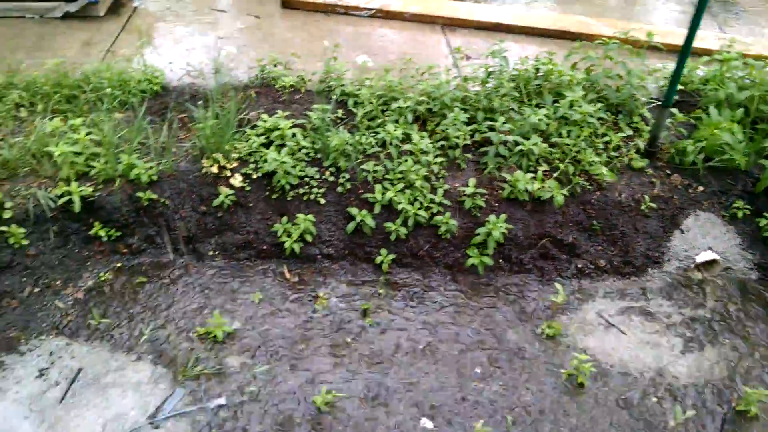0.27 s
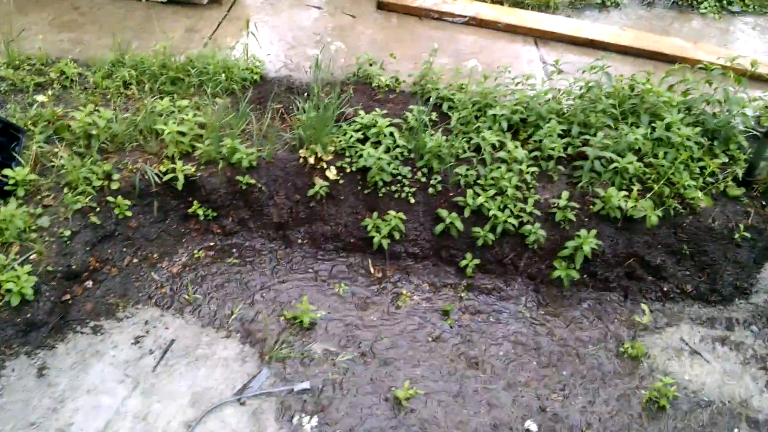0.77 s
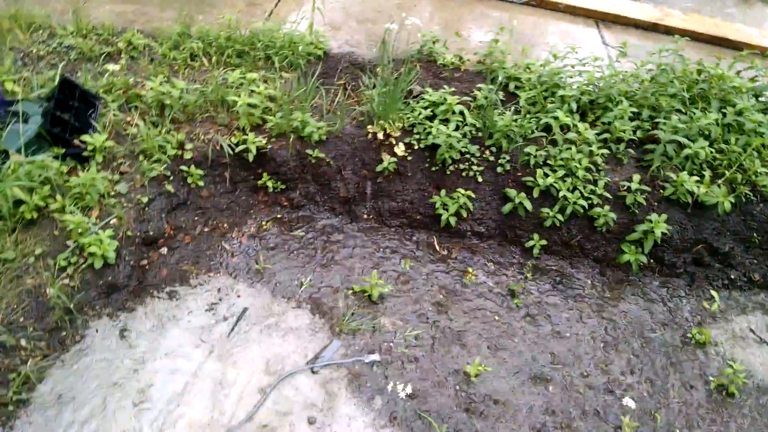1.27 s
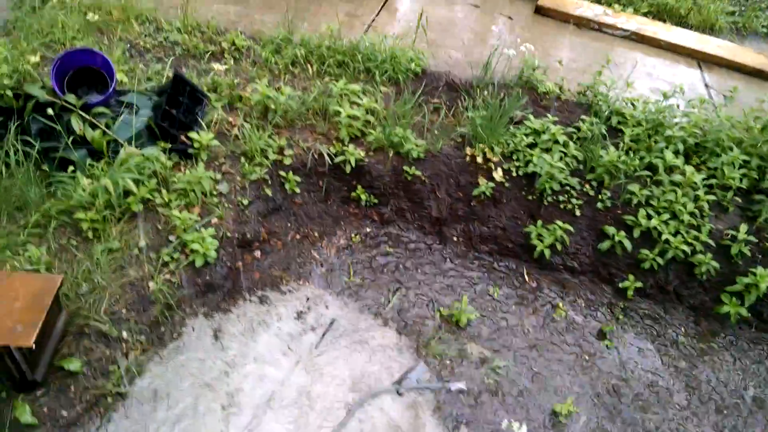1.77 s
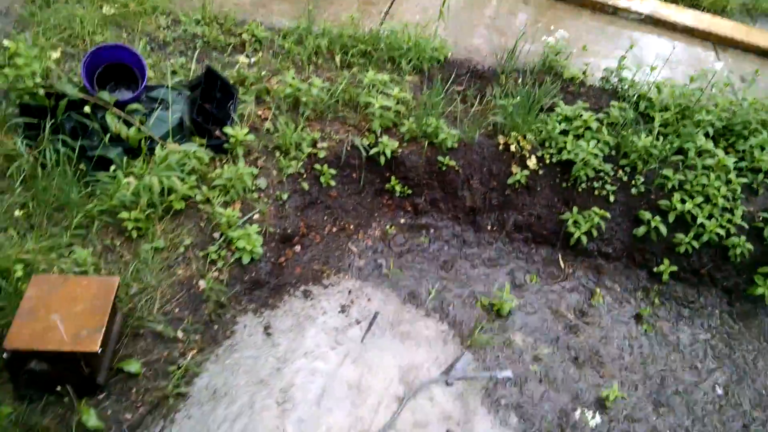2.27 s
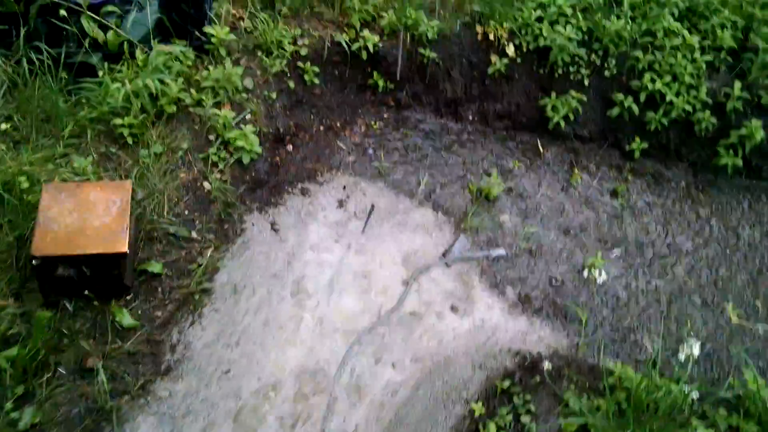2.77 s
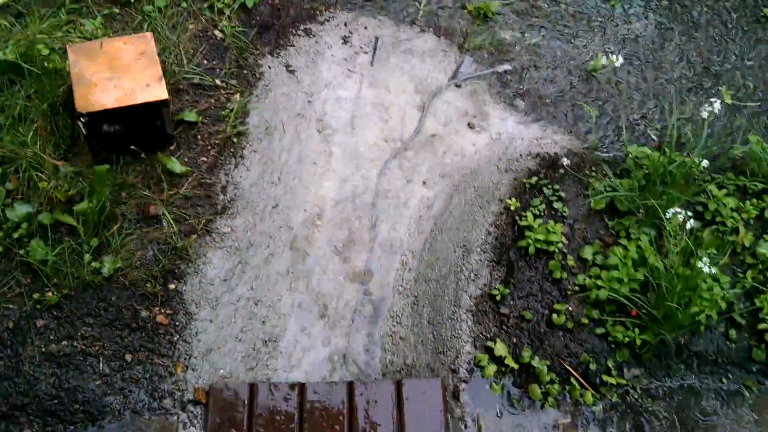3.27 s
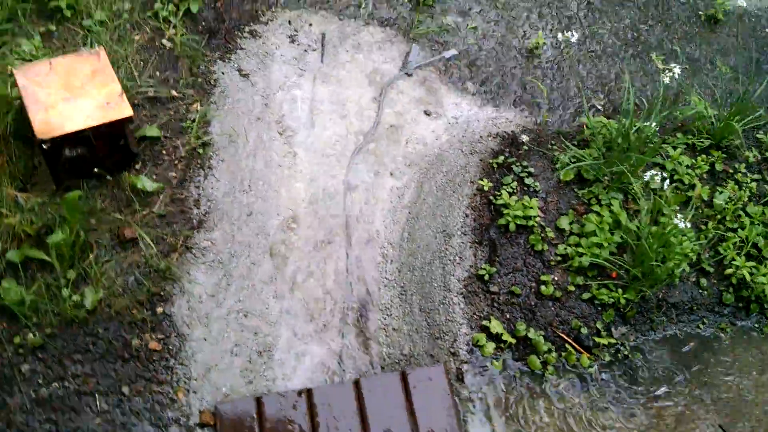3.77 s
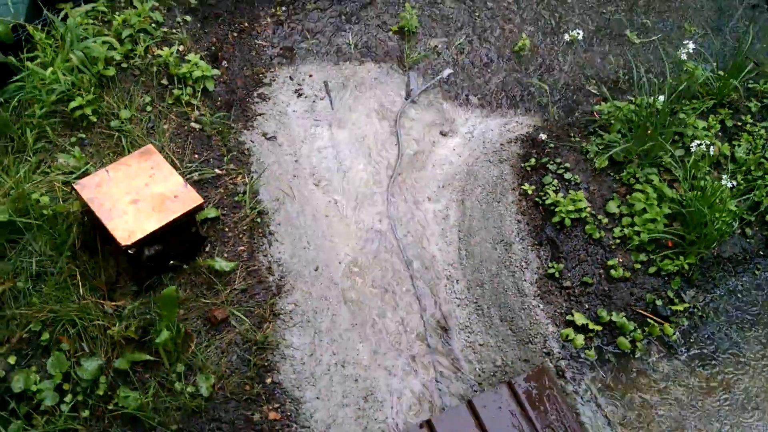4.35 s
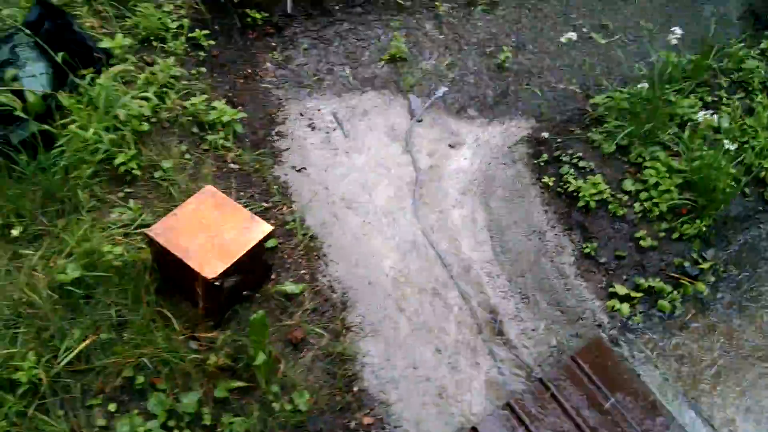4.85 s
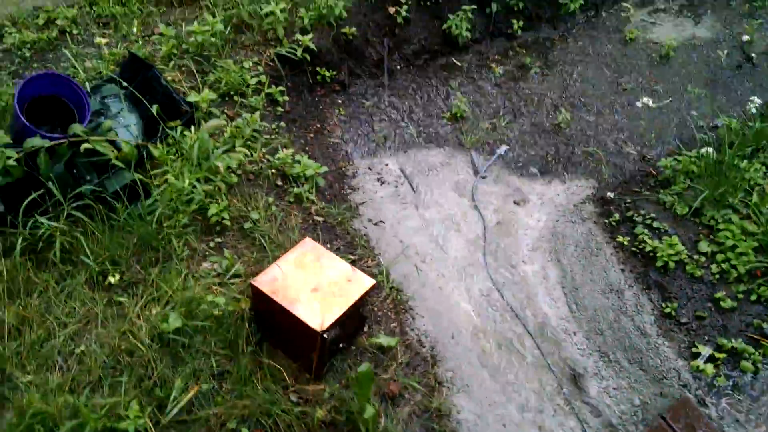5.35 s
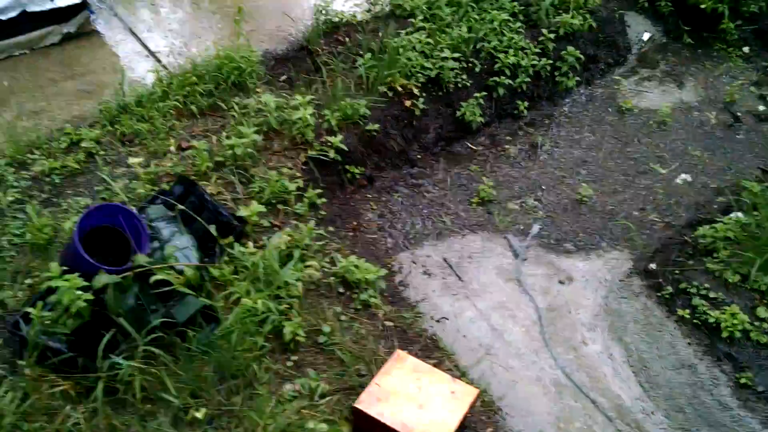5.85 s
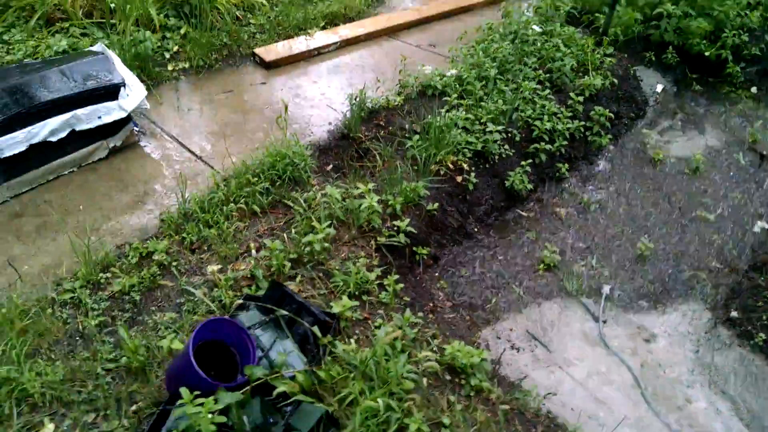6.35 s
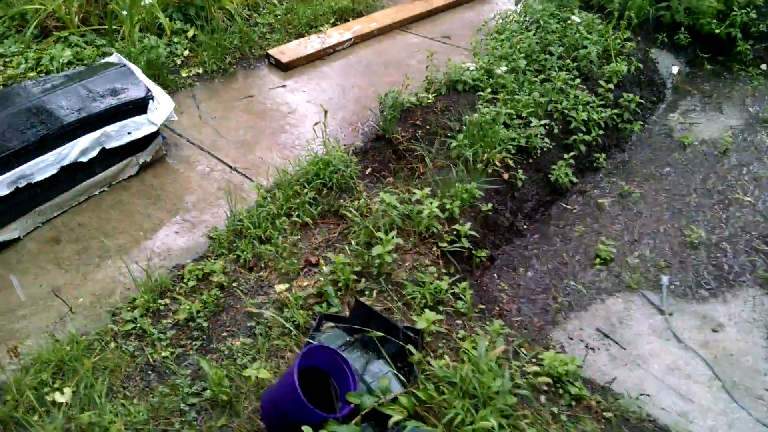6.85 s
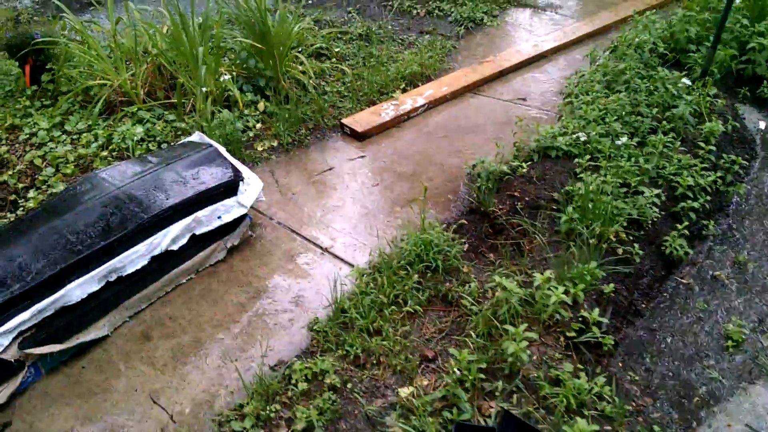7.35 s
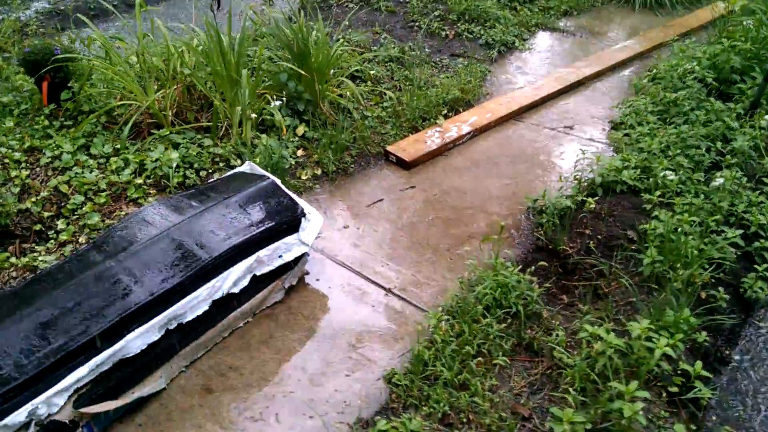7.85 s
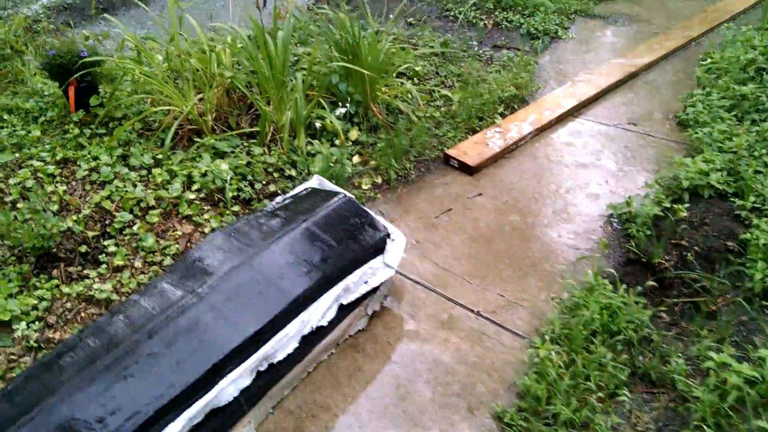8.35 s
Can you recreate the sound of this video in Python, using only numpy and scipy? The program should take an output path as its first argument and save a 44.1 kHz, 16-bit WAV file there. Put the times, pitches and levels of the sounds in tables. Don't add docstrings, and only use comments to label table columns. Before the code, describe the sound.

Close under an umbrella in a downpour: dense cloth patter, heavy drops popping, crisp crackles, broad garden rain hiss and faint puffs of wind.

```python
import sys
import numpy as np
from scipy import signal
from scipy.fft import rfft, irfft, next_fast_len
from scipy.io import wavfile
from scipy.ndimage import uniform_filter1d

SR = 44100
rng = np.random.default_rng(int(sys.argv[2]) if len(sys.argv) > 2 else 0)


def persist_wave(psi):
    counts = np.round(np.clip(psi, -1, 1) * 32767).astype(np.int16)
    wavfile.write(sys.argv[1], SR, np.atleast_2d(counts).T)


def ratio(d):
    e = np.asarray(d, float) / 20
    return 10 ** e


N = 380135
T = np.arange(N) / SR
# frequency in Hz, level in dB.
SPRAY_TONE = [(300, -18.5), (1500, 8.5), (4000, -0.5), (8000, -1.5), (12000, -1.5), (15500, 4)]


def response(spectrum, shift=0.92):
    hz, db = np.transpose(spectrum)
    grid = np.arange(1025) * SR / 2048 + 1
    log_gain = np.log(ratio(np.interp(np.log(grid), np.log(hz * shift), db)))
    ceps = irfft(log_gain)
    ceps[1:1024] *= 2
    ceps[1025:] = 0
    return irfft(np.exp(rfft(ceps)))[:1024]


def convolve(x, shape):
    return signal.oaconvolve(x, shape[None], axes=1)[:, :N]


def colour(x, spectrum):
    return convolve(x, response(spectrum))


def unit(x):
    return x / np.sqrt(np.mean(x ** 2))


def walk(rate):
    hold = int(SR / rate)
    steps = np.repeat(rng.standard_normal(N)[:N // hold + 1], hold)
    return 0.78 * uniform_filter1d(uniform_filter1d(steps, hold), hold)[:N]


def impacts(s, size, side):
    port_span = 14.0
    out = np.zeros((2, N))
    for port, sign in enumerate((1, -1)):
        at = np.round(s * SR + sign * side * port_span / 2).astype(int)
        out[port] = np.bincount(np.clip(at, 0, N - 1), size, N)
    return out


def smear(x, t60):
    t = np.arange(300) / SR
    return convolve(x, ratio(-60 * t / t60)) * rng.standard_normal((2, N))


def shower(count, scatter_db, cap_db):
    when, chance, side, spare = rng.random((count, 4)).T
    size = ratio(np.minimum(-scatter_db * np.log(chance), cap_db))
    return when * N / SR, size, 2 * side - 1, spare


def gust_db():
    # start in seconds, peak level in dB, hold in seconds.
    gusts = [
        (0.05, -50, .2),
        (1.7, -45, .1),
        (3.0, -46, .05),
        (4.45, -41, .25),
        (4.82, -32, .48),
        (5.9, -46, .2),
        (7.2, -44, .1),
        (8.5, -67, .2),
    ]
    calm_db, rise_db_s, fall_db_s = -78, 60, 60
    s, db, hold = np.transpose(gusts)[:, :, None]
    t = T[::64]
    shape = db - rise_db_s * np.maximum(s - t, 0) - fall_db_s * np.maximum(t - s - hold, 0)
    return np.interp(T, t, np.maximum(shape.max(axis=0), calm_db))


def wind(db):
    # frequency in Hz, level in dB.
    puff_tone = [(15, 25), (50, -15), (100, 7), (200, -37), (500, -12), (16000, -58)]
    return unit(colour(rng.standard_normal((2, N)), puff_tone)) * ratio(db + 1.9 * walk(rate=37))


def garden(db):
    # frequency in Hz, level in dB.
    garden_tone = [(25, -3), (60, 17.5), (150, 5), (500, 6.5), (1200, 1), (2500, 1.5), (4500, -4),
                   (7000, -2), (10000, -6.5), (13000, -7), (15500, -1)]
    s, size, side, sign = shower(count=200000, scatter_db=3.0, cap_db=20)
    far = impacts(s, size * np.sign(sign - .5), side)
    patches_db = 1.9 * walk(rate=9) + 1.18 * walk(rate=30)
    return unit(colour(far, garden_tone)) * ratio(db - 5.5 + patches_db)


def stray_ticks(ungain, garden_db):
    when, size, dull = rng.random(size=(55, 3)).T
    at = when * N / SR
    db = np.interp(at, T, garden_db) - ungain(at) + 4 + 8.5 * size
    return np.transpose([at, db, -24 + 12 * (dull - .5)])


def ticks(ungain, garden_db):
    # time in seconds, peak level in dB, mid-band share in dB.
    near_ticks = [(0.2312, -11, -16), (0.3106, -5, -9), (0.5121, -11, -20), (0.8474, -13, -7),
                  (1.1633, -8, -3), (1.2978, -11, -20), (1.402, -9, -18), (1.4645, -8, -15),
                  (1.7555, -10, -16), (2.1467, -9, -17), (2.208, -3, -19), (3.1294, -4, -21),
                  (3.4556, -2, -21), (3.894, -9, -20), (4.0151, -8, -11), (4.7075, -11, -11),
                  (4.8251, -7, -17), (5.2111, -10, -13), (5.341, -10, -17), (5.4712, -10, -12),
                  (5.8777, -9, -18), (5.9702, -7, -13), (6.0154, -13, -20), (6.2859, -9, -20),
                  (6.678, -13, 1), (7.0009, -9, -13), (7.3391, -8, -14), (7.5151, -7, -18),
                  (7.7842, -8, -19), (7.8515, -9, -16)]
    # frequency in Hz, level in dB.
    dull_tone = [(500, -9), (2500, -16), (5000, 16.5), (8000, 13), (15500, -66)]
    cavity_hz, cavity_t60 = 14600, .0011
    s, db, dull_db = np.transpose(np.vstack([near_ticks, stray_ticks(ungain, garden_db)]))
    db = db + ungain(s)
    snap = impacts(s - .0002, ratio(db), 0 * s + .3)
    t = np.arange(100) / SR
    ring = np.cos(2 * np.pi * cavity_hz * t) * ratio(-60 * t / cavity_t60)
    dull = colour(smear(impacts(s - .0003, ratio(db + dull_db), 0 * s), t60=0.01), dull_tone)
    wisp = colour(smear(snap, t60=0.002), SPRAY_TONE)
    return convolve(snap, ring) * ratio(0.5) + wisp * ratio(-8) + dull * ratio(-15)


def thump(s, size, hz, side):
    # frequency in Hz, level in dB.
    cloth_tone = [(30, -4), (100, -2.5), (200, -0.5), (330, 2.5), (460, 3.5), (640, -4.5), (900, -5.5),
                  (1500, -12.5), (2500, -5), (5000, -24), (16000, -34.5)]
    contact_s, lean, centre_s = 0.00016, .55, .00055
    out, steps = 0, np.array([420, 490, 570, 680])
    pick = np.argmin(abs(np.log(hz[:, None] / steps)), axis=1)
    for k, step in enumerate(steps):
        shift = step / 530
        push = np.exp(-(np.arange(-40, 41) / SR * shift / contact_s) ** 2)
        gain = abs(rfft(np.convolve(push, response(cloth_tone, shift)), 2048))
        hump = np.roll(irfft(gain * np.exp(1j * lean)), 1024)
        shape = hump[512:1536] * np.hanning(1024)
        hits = impacts(s + centre_s / shift, (pick == k) * size / abs(shape).max(), side)
        out = out + signal.oaconvolve(hits, shape[None], axes=1)[:, 512:N + 512]
    return out


def cloth(db):
    s, size, side, spot = shower(count=2600, scatter_db=3, cap_db=9)
    body = thump(s, size, 400 + 320 * spot, 0.67 * side)
    burst = size * ratio(8.6 * rng.standard_normal(len(s)).clip(-2, 2))
    spray = colour(smear(impacts(s + .0025, burst, side), t60=0.014), SPRAY_TONE)
    mix = unit(body - body.mean()) * ratio(-4.0) + unit(spray) * ratio(-11)
    return ratio(db + 0.74 * walk(rate=11)) * mix


def big_drops(ungain, cloth_db):
    # time in seconds, peak level in dB, pitch in Hz.
    thumps = [(0.134, -0.5, 680), (0.225, 0.5, 550), (0.3063, -6, 570), (0.542, -11, 570),
              (0.8912, -16, 480), (0.944, -20, 490), (1.0795, -9, 524), (1.4389, -8, 590),
              (1.7837, -8, 630), (2.1559, -6.5, 540), (2.4837, -7, 590), (2.563, -2, 460),
              (2.5853, -2.5, 527), (2.7447, -7, 550), (2.937, -12, 550), (3.0061, -5, 590),
              (3.5115, -14, 550), (3.8753, -16, 590), (4.381, -8, 630), (4.9003, -10, 450),
              (5.033, -8, 533), (5.198, -5, 740), (5.6962, -2, 537), (6.2512, -22, 490), (6.8728, -10, 480),
              (6.972, -6.5, 340), (7.3512, -0.5, 460), (7.3971, -2.5, 535), (7.5218, -4.5, 440),
              (8.043, -5.5, 570)]
    s, db, hz = np.transpose(thumps)
    heavy_side = 0.65 * (2 * rng.random(len(s)) - 1)
    heavy = thump(s, ratio(db - 3.5 + ungain(s)), hz, heavy_side)
    when, lag, size, spot, side = rng.random(size=(240, 5)).T
    clump = (np.arange(80) + 2 * when[::3] - .5) / 80 * N / SR
    at = np.repeat(clump, 3) + .05 * lag
    fat_db = np.interp(at, T, cloth_db) + 8.5 + 6 * size
    return heavy + thump(at, ratio(fat_db), 440 + 350 * spot, 1.4 * (side - .5))


def duck_db():
    # time in seconds, drop in dB.
    ducks = [(0.313, 8.5), (1.165, 2.5), (1.465, 3), (2.209, 4.5), (2.6, 1), (3.128, 5), (3.455, 6.5),
             (4.017, 4), (5.491, 4), (5.969, 6.5), (6.016, 1.5), (7.0, 2), (7.785, 3.5), (7.852, 3.5)]
    attack_s, recover_s = 0.0077, 0.65
    s, drop_db = np.transpose(ducks)[:, :, None]
    t = T[::32]
    age = np.maximum(t - s, 0)
    db = -np.sum(drop_db * (1 - np.exp(-age / attack_s)) * np.exp(-age / recover_s), axis=0)
    return np.interp(T, t, db)


def scene():
    # time in seconds, garden level in dB, cloth level in dB.
    rain = [(0, -20.5, -24), (.5, -24, -24.5), (1.2, -20.5, -25), (1.9, -22.5, -26), (2.5, -20.5, -24),
            (3.2, -20.5, -22), (4.1, -20, -22.5), (4.7, -22, -22.5), (5.3, -22.5, -25.5),
            (5.8, -20.5, -23.5), (6.5, -25.5, -27), (7.25, -21, -23.5), (7.7, -22, -26), (8.62, -21, -26)]
    # frequency in Hz, level in dB.
    right_port = [(60, 2), (400, 3), (2000, 3.67), (4500, 4.2), (7000, 1.1), (10000, 6.4), (13500, 9),
                  (15500, 8.5)]
    s, garden_db, cloth_db = np.transpose(rain)
    garden_db, cloth_db = np.interp(T, s, garden_db), np.interp(T, s, cloth_db)
    duck = duck_db()

    def ungain(at):
        return -np.interp(at, T, duck)

    air = garden(garden_db) + ticks(ungain, garden_db)
    air = air + cloth(cloth_db) + big_drops(ungain, cloth_db)
    air[1:] = colour(air[1:], right_port)
    return air + wind(gust_db() - duck)


def subtract_ports(dry):
    notch_hz, cross = 2501, 0.93
    size = next_fast_len(N + 4096)
    hz = np.arange(size // 2 + 1) * SR / size
    left, right = rfft(dry, size)
    bend = 1 - 0.032 * np.exp(-((hz - 9300) / 3600) ** 2)
    late = cross * np.exp(-2j * np.pi * hz / notch_hz * bend)
    return irfft(np.array([left - late * right, right - late * left]), size)[:, :N]


def refill(pair):
    # frequency in Hz, share in dB.
    noise_share = [(300, -17.5), (1200, -9), (3700, -7), (5000, -2.5), (6300, 1), (8000, -4.5), (10300, -5),
                   (12800, -13), (15000, -15)]
    hole_db, top_hz = -10, 15560
    hz, _, z = signal.stft(pair, SR, nperseg=512)
    bins, frames = np.arange(z.shape[1])[:, None] // 4, np.arange(z.shape[2]) // 4
    top = abs(z[:, hz > 13000]).sum(axis=(0, 1))
    usual_top = uniform_filter1d(top, size=60)
    crack = top > 2.1 * usual_top
    flutter = rng.standard_normal((2, bins.max() + 1, frames.max() + 1))[:, bins, frames]

    share_hz, share_db = np.transpose(noise_share)
    share_db = np.interp(np.log(hz + 1), np.log(share_hz), share_db)[:, None]
    share = np.clip(ratio(share_db + 3.8 * flutter[0]), 0, .95) * ~crack
    band = np.sqrt(uniform_filter1d(abs(z) ** 2, size=7, axis=1))
    hiss = signal.stft(rng.standard_normal(pair.shape), SR, nperseg=512)[2]
    z = np.sqrt(1 - share ** 2) * z + share * band * hiss / np.sqrt(np.mean(abs(hiss) ** 2))

    both = np.array([z[0] + z[1], z[0] - z[1]])
    power = uniform_filter1d(uniform_filter1d(abs(both) ** 2, size=4, axis=1), size=4, axis=2)
    middle_bin, middle_frame = np.minimum(4 * bins + 2, 256), np.minimum(4 * frames + 2, len(frames) - 1)
    power = power[:, middle_bin, middle_frame]
    f = hz[:, None]
    limit_db = hole_db + 4 * (abs(f - 4000) < 1900) + 6 * (abs(f - 5150) < 500)
    strong = np.sqrt(power / power[::-1]) > ratio(limit_db + 1.3 * flutter[1])
    both = both * (strong | (abs(f - 7700) > 6800) | crack)
    both = both * np.where(f < top_hz, 1, ratio(-5) * (top > 3.8 * usual_top))
    sides = np.array([both[0] + both[1], both[0] - both[1]]) / 2
    return signal.istft(sides, SR, nperseg=512)[1][:, :N]


def top_cut(x):
    return signal.sosfilt(signal.butter(12, 16660, fs=SR, output="sos"), x)


def record(dry):
    pair = subtract_ports(dry) * ratio(duck_db())
    mix = refill(np.clip(pair, -1, 1))
    return top_cut(mix)


dry = scene()
out = record(dry)
persist_wave(out)
```